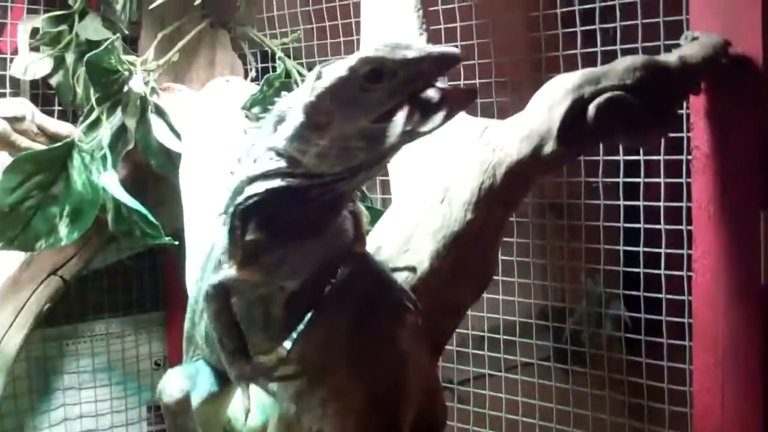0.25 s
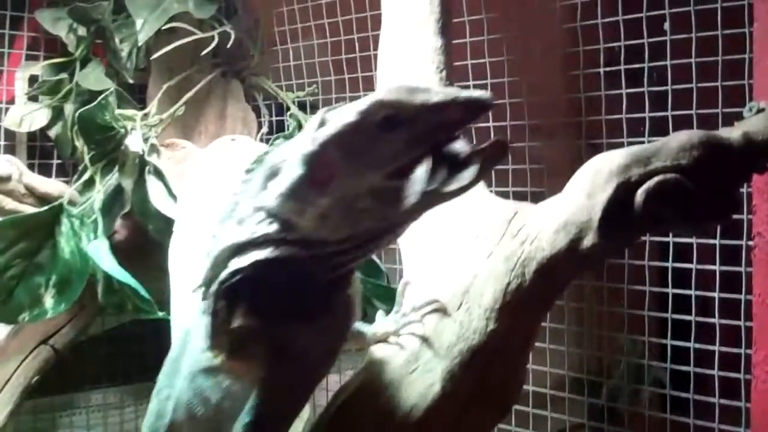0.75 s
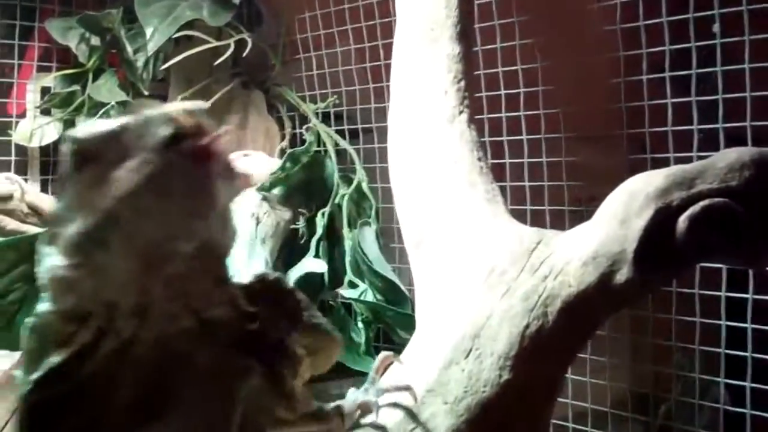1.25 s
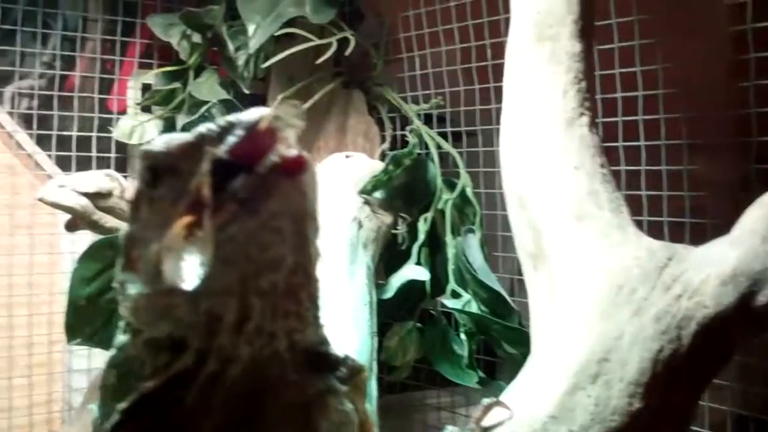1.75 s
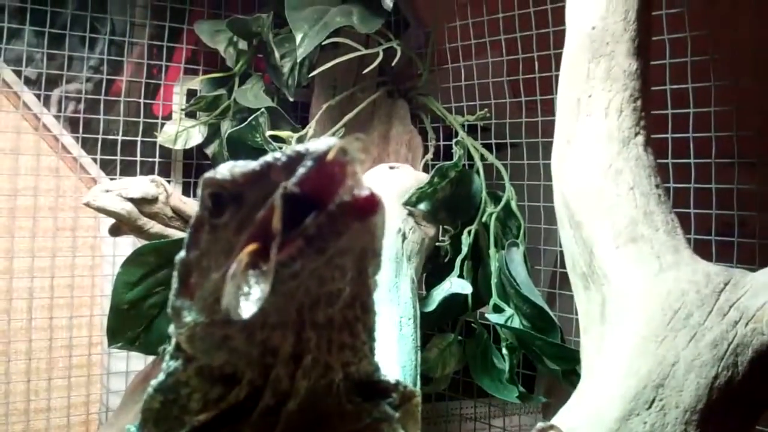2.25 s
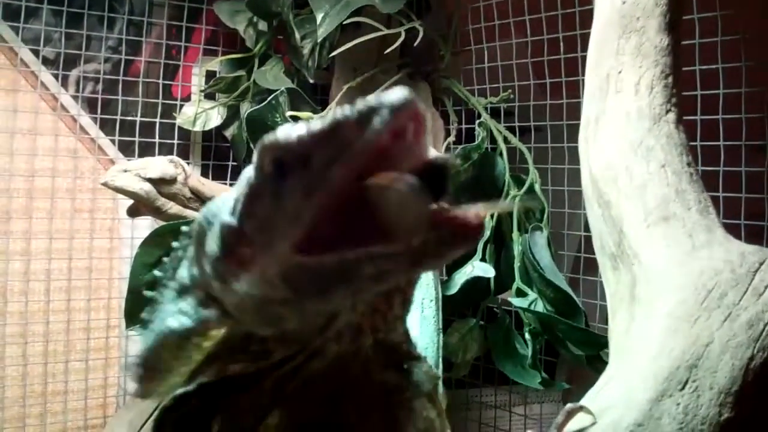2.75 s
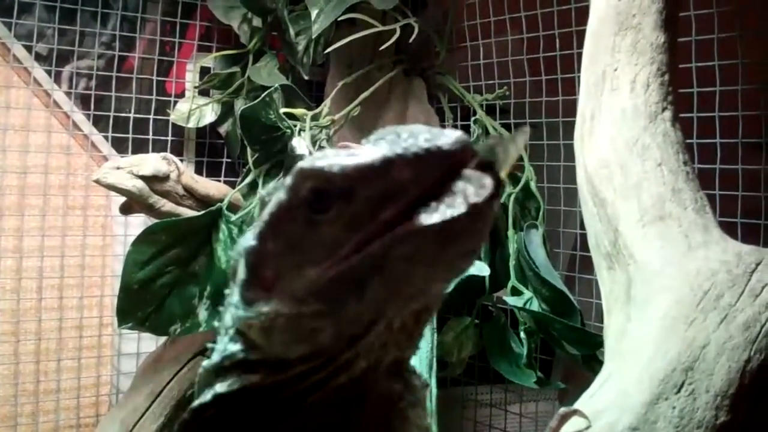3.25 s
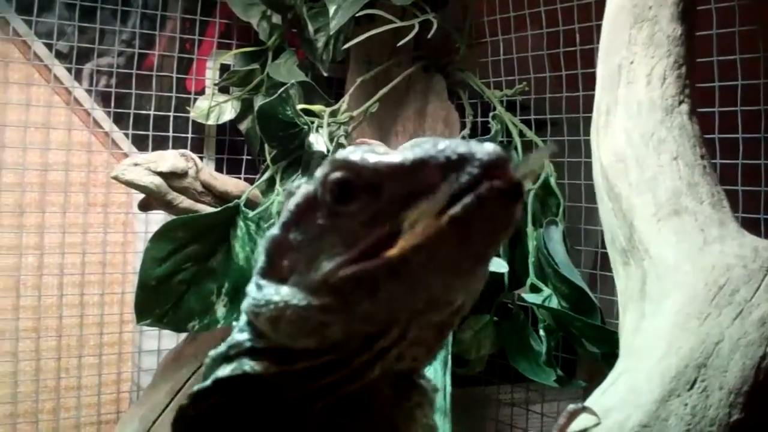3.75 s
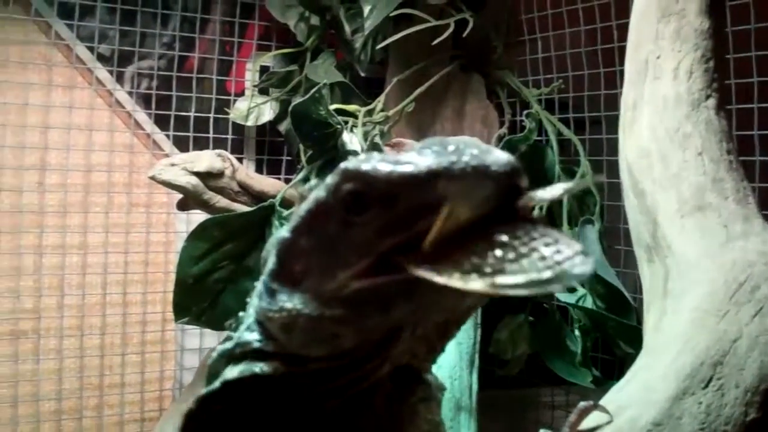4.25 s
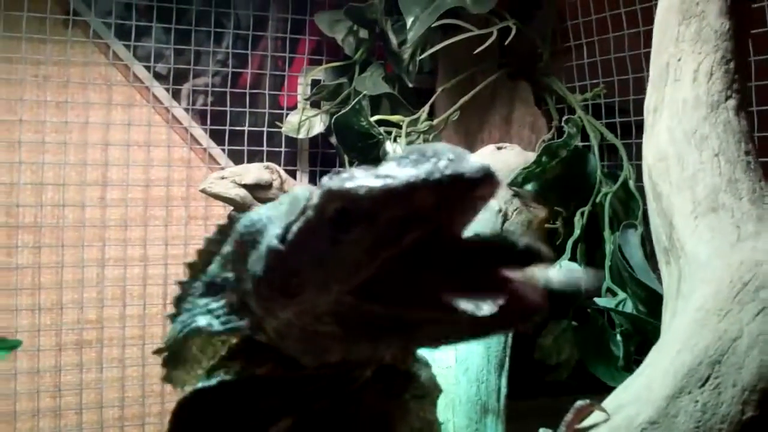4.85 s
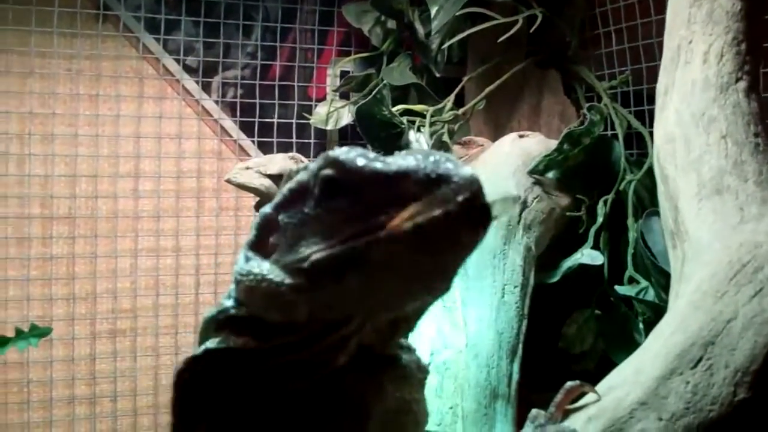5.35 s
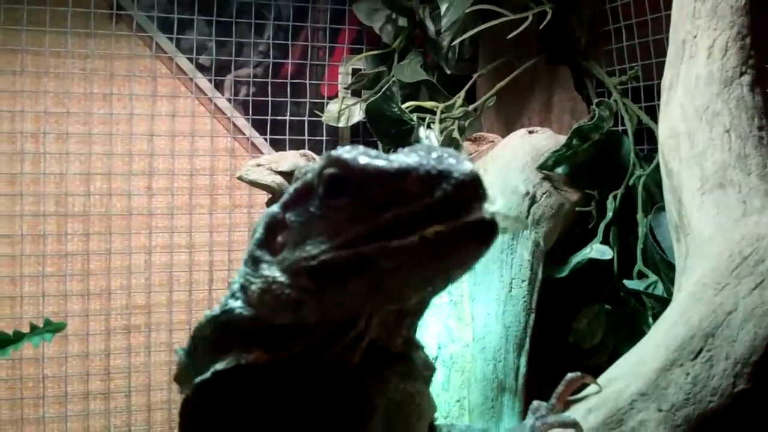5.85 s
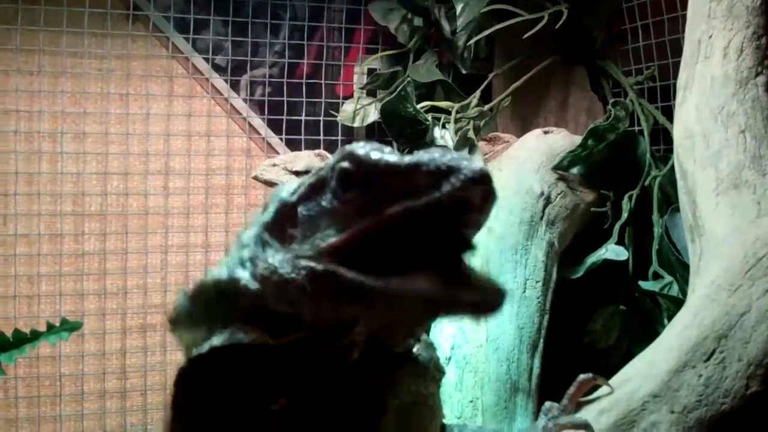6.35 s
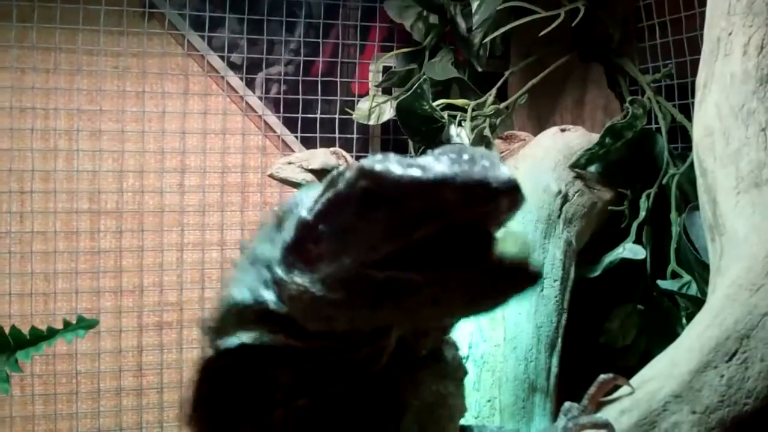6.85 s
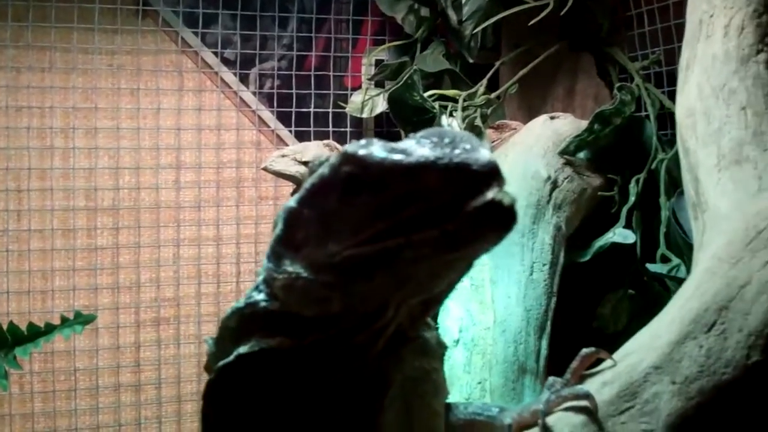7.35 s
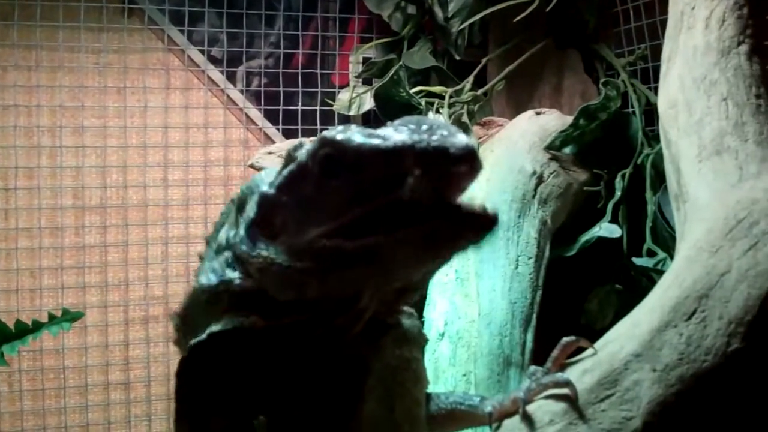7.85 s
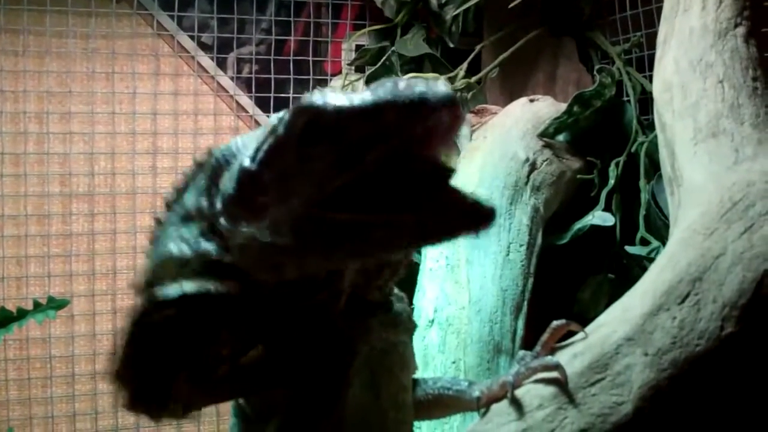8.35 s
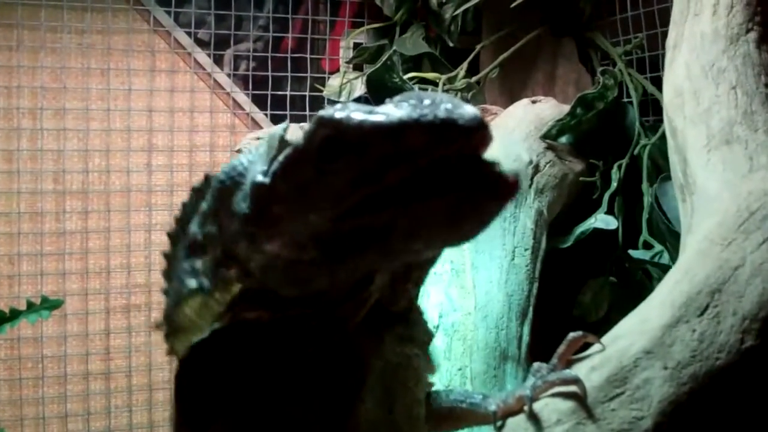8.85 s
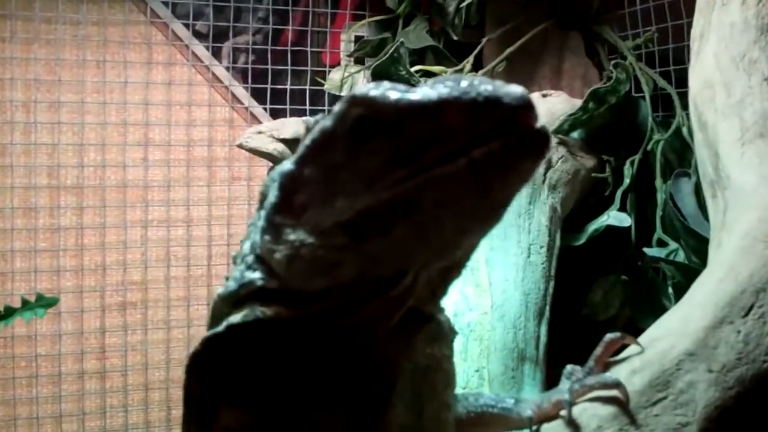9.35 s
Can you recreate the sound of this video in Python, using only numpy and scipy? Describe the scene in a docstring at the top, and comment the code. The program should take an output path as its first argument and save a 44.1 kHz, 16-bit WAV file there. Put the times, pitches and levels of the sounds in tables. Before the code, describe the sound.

A lizard crunches a large insect close by, crisp bright snaps and wing rustles over low hum and a fluttering, pulsing hollow rush.

```python
"""In a mesh terrarium a lizard clambers along a branch, claws scraping, and chews a large insect close by.
Each bite is a rustle of wings, then a crush: a swarm of tiny random fractures, with sharp snaps set singly.
Jaws and feet knock as pushes with a low ring; faint squeaks are notes of unsteady pitch. Behind lie hum, room
noise and a hollow rush, resonant noise surging about three times a second; gain control ducks loud sounds."""
import sys
import numpy as np
from scipy import signal
from scipy.fft import rfft, irfft, next_fast_len
from scipy.io import wavfile
from scipy.ndimage import uniform_filter1d, map_coordinates

SR = 44100
rng = np.random.default_rng(int(sys.argv[2]) if len(sys.argv) > 2 else 0)


def transcribe(u):
    """Save the signal u as a 16-bit wav file named by the first command-line argument.

    u: samples, shape (n,) or (channels, n), limited to [-1, 1]; the rate is SR.
    q: integer samples, one column per channel.
    """
    v = np.clip(np.atleast_2d(u).T, -1, 1)
    q = np.round(v * 32767).astype(np.int16)
    wavfile.write(sys.argv[1], SR, q)


N = 423360
TIME = np.arange(N) / SR  # s
MOUTH_HZ = 3810  # ring of the open mouth

# Spectrum of the cracking shell. Each row: frequency in Hz, relative density in dB.
SHELL_SPECTRUM = [(100, -36), (900, -14), (2200, -9.5), (3700, -4), (5600, -4.5), (8500, 1), (11000, -1),
                  (14000, -0.5)]


def amp(db):
    """Decibels to gain."""
    return 10 ** (np.asarray(db) / 20)


def unit(x):
    """Scale to rms 1."""
    return x / np.sqrt(np.mean(x ** 2) + 1e-20)


def along(points, hz):
    """Interpolate (Hz, value) points on a log frequency axis."""
    point_hz, values = np.transpose(points)
    return np.interp(np.log(hz + 1), np.log(point_hz), values)


def over_time(points):
    """Join (s, value) points by straight lines."""
    return np.interp(TIME, *np.transpose(points))


def wobble(knots_per_s):
    """Smooth random curve through normally distributed knots."""
    return map_coordinates(rng.standard_normal(4096), [TIME * knots_per_s], mode="wrap")


def swells(rows, rest_db, steepness=2):
    """Power of overlapping (middle s, half length s, dB) swells over a rest level; steep ones end abruptly."""
    def bell(u):
        return np.exp(-np.minimum(np.abs(u), 6) ** np.where(u < 0, 2, steepness))

    coarse_s = TIME[::20]
    power = sum(amp(db) ** 2 * bell((coarse_s - s) / half_s) for s, half_s, db in rows)
    return amp(rest_db) ** 2 + np.interp(TIME, coarse_s, power)


def filtered(x, response):
    """Multiply the spectrum of x by a response of frequency in Hz."""
    size = next_fast_len(N + SR // 2)
    hz = np.fft.rfftfreq(size, 1 / SR)
    return irfft(rfft(x, size) * response(hz), size)[..., :N]


def coloured(x, spectrum):
    """Filter x by a (Hz, dB) spectrum."""
    return filtered(x, lambda hz: amp(along(spectrum, hz)))


def resonances(modes, hz):
    """Power-summed gain of (centre Hz, width Hz, dB) resonances."""
    power = 0
    for centre, width, db in modes:
        mode = amp(db) * hz * width / (centre * centre - hz * hz + 1j * hz * width)
        power = power + np.abs(mode) ** 2
    return np.sqrt(power)


def panned(x, left_db):
    """Lean a sound left by a level difference."""
    return x * amp([[left_db / 2], [-left_db / 2]])


def diffuse(gain):
    """Stereo noise of rms 1 from all around: alike in the bass, nearly unrelated in the treble."""
    # Left-right correlation. Each row: frequency in Hz, correlation from 0 to 1.
    correlation = [(100, 0.55), (700, 0.89), (1400, 0.71), (3000, 0.02)]

    def mid_side(hz):
        angle = np.arccos(np.clip(along(correlation, hz), 0, 1)) / 2
        return gain(hz) * np.array([np.cos(angle), np.sin(angle)])

    mid, side = filtered(rng.standard_normal((2, N)), mid_side)
    return unit(np.array([mid + side, mid - side]))


def add(track, s, sound):
    """Mix a sound into a track at time s."""
    part = track[..., max(round(s * SR), 0):][..., :sound.shape[-1]]
    part += sound[..., :part.shape[-1]]


def room(noise_db, hum_db, waver_db):
    """Wavering hum tones of the terrarium's equipment over steady diffuse noise."""
    # Mains hum and neighbouring tones. Each row: frequency in Hz, relative peak level in dB.
    hum_tones = [(97, -76), (120, -64.5), (180, -79), (236.7, -72), (243.3, -76)]
    # Room noise spectrum. Each row: frequency in Hz, relative density in dB.
    noise_spectrum = [(25, -5), (100, -6.5), (220, -2), (340, -4.5), (500, -1), (1300, -27), (2000, -13),
                      (5200, -9), (14000, -5.5)]
    hum = 0
    for hz, db in hum_tones:
        level = amp(db + hum_db + waver_db * wobble(4.1))
        hum = hum + level * np.sin(2 * np.pi * hz * TIME + 0.16 * wobble(2.3))
    noise = amp(noise_db) * diffuse(lambda hz: amp(along(noise_spectrum, hz)))
    return panned(hum + noise, left_db=2.5)


def surges(uneven_db):
    """Surges of the rush: a strictly timed cycle, each surge of slightly different strength."""
    # One cycle. Each row: middle in seconds into the cycle, half length in s, relative level in dB.
    cycle = [(0.023, 0.015, -51.5), (0.07, 0.03, -52), (0.159, .028, -47.9), (0.225, 0.02, -51.5)]
    period_s = .3
    starts_s = np.arange(0, N / SR, period_s)
    return [(start + s, half_s, db + uneven_db * rng.normal())
            for start in starts_s for s, half_s, db in cycle]


def rush(rest_db, hollow_db, whistle_db, brighten, puff_bright_db, flutter_db, shimmer_db):
    """Fluttering noise pulses in shimmering hollow resonances; strong pulses and extra puffs are brighter."""
    # Hollow resonances. Each row: centre in Hz, width in Hz, relative level in dB.
    hollow_modes = [(660, 50, -5), (747, 32, 0), (960, 65, -8), (1118, 60, -5), (1338, 34, -0.5),
                    (1550, 150, -11), (1960, 70, -12)]
    # Thinner upper resonances. Each row: centre in Hz, width in Hz, relative level in dB.
    whistle_modes = [(2650, 1030, 8), (3390, 110, 13), (3633, 59, 16.5), (3880, 260, 4)]
    # Slow level drift. Each row: time in s, gain in dB.
    drift = [(0, 2.5), (.76, 5.5), (1.3, 2), (6.4, 0), (9.45, 2)]
    # Extra puffs of the rush, some on the beat, some between.
    # Each row: middle in s, half length in s, relative level in dB.
    puffs = [(.4, 0.018, -50), (.63, .012, -51), (1.82, 0.01, -50), (1.863, 0.009, -50), (2.21, 0.02, -51),
             (2.83, 0.044, -49), (4.04, 0.014, -48), (4.35, .02, -53), (4.655, 0.019, -52),
             (4.96, .02, -49), (5.255, 0.012, -49), (5.565, .02, -49), (6.105, 0.006, -50),
             (7.115, 0.026, -54), (7.85, 0.012, -48), (8.26, 0.03, -54), (8.545, .02, -48),
             (9.08, 0.012, -50), (9.45, 0.025, -48)]

    def level_db(rows):
        return 10 * np.log10(swells(rows, rest_db)) + over_time(drift)

    def band(hz):
        return 1 / np.sqrt((1 + (520 / (hz + 1)) ** 6) * (1 + (hz / 2500) ** 4))

    beat = surges(uneven_db=0.5)
    swell_db = level_db(beat + list(puffs))
    edge_db = level_db(beat + [(s, half_s, db + puff_bright_db) for s, half_s, db in puffs])
    flutter = flutter_db * (wobble(55) + wobble(170))
    hollow = 0
    for centre, width, db in hollow_modes:
        shimmer = amp(db + shimmer_db * wobble(32))
        noise = diffuse(lambda hz: resonances([(centre, width, 0)], hz) * band(hz))
        hollow = hollow + shimmer * np.sqrt(width) * noise
    body = amp(swell_db + flutter + hollow_db) * unit(hollow)
    brightness_db = brighten * (swell_db - swell_db.mean())
    edge_gain = amp(edge_db + flutter + whistle_db + brightness_db)
    edge = edge_gain * diffuse(lambda hz: resonances(whistle_modes, hz))
    return panned(body, left_db=2.5) + panned(edge, left_db=7.5)


def squeaks(level_db, width):
    """Brief, faint sine notes of unsteady pitch under bell-shaped envelopes."""
    # Each row: middle in s, half length in s, frequency in Hz, relative level in dB.
    notes = [(0.528, 0.024, 1560, -37.5), (0.72, 0.022, 2720, -36), (1.003, 0.011, 2880, -43),
             (9.173, 0.014, 443, -43.5)]
    out = 0
    for s, half_s, hz, db in notes:
        phase = 2 * np.pi * hz * np.cumsum(1 + width * wobble(480)) / SR
        out = out + amp(db + level_db) * np.exp(-((TIME - s) / half_s) ** 2) * np.sin(phase)
    return out


def scrapes(level_db, rough_db):
    """A claw slips on bark at once and skids to rest, catching on the grain with a thin, gritty hiss."""
    # Claw slips. Each row: start in s, relative level in dB, 60 dB decay time in s.
    slips = [(.397, -44, .12), (.454, -38, .06), (.462, -36, .1), (.517, -25.5, .07), (.689, -26, .04),
             (.701, -28, .11), (.723, -29.5, .07), (.858, -46, .05), (.91, -45, .06), (.952, -35, .12),
             (.971, -33, .13)]
    # Scratch spectrum. Each row: frequency in Hz, relative density in dB.
    scratch_spectrum = [(100, -35), (500, -14.5), (2000, -20.5), (2750, -12.5), (4000, -23), (8000, -14),
                        (11500, -5), (13500, -2.5)]
    power, t = np.zeros(N), np.arange(SR // 5) / SR
    for s, db, t60_s in slips:
        add(power, s, amp(db - 60 * t / t60_s) ** 2)
    catching = amp(rough_db * (wobble(1500) + wobble(250)))
    noise = rng.standard_normal((2, N)) + rng.standard_normal(N)  # partly shared by both sides
    grit = unit(coloured(noise * catching, scratch_spectrum))
    return panned(amp(level_db) * np.sqrt(power) * grit, left_db=1.5)


def knocks(level_db, ring_db, t60_s):
    """Dead contacts of jaws and feet: one abrupt push and a brief low ring."""
    # Each row: start in s, relative level in dB, ring in Hz.
    contacts = [(0.975, -48, 176), (1.1768, -42, 218), (1.1968, -49, 900), (2.4815, -41.5, 200),
                (2.4962, -45.5, 220), (2.5103, -43, 180), (2.861, -51, 294), (7.746, -48, 420),
                (7.755, -47, 430)]
    # Knock spectrum. Each row: frequency in Hz, relative density in dB.
    jaw_spectrum = [(30, -12), (150, -7), (450, 1), (900, 0), (3000, -1.5), (6000, -2)]
    out, t = np.zeros(N), np.arange(SR // 25) / SR
    for s, db, hz in contacts:
        ring = amp(-60 * t / t60_s) * np.cos(2 * np.pi * hz * t)
        push = t == 0
        add(out, s, amp(db + level_db) * (push + amp(ring_db) * ring / np.linalg.norm(ring)))
    return coloured(out, jaw_spectrum)


def chewing():
    """Power of the crackle: each bite is a rustle, then a crush that stops as the jaws meet."""
    # Jaws closing on shell and wings. Each row: middle in s, half length in s,
    # relative level of the crush in dB, relative level of the rustle before it in dB.
    bites = [(1.199, 0.032, -35.5, -60), (1.539, 0.022, -38, -45), (2.495, 0.027, -37.5, -56),
             (2.545, 0.01, -38, -67), (2.889, 0.02, -38.5, -48.5), (3.287, 0.007, -31, -52),
             (3.318, 0.012, -30.5, -53), (3.742, 0.03, -46, -47), (4.12, 0.007, -33, -55),
             (4.158, 0.015, -33, -59), (4.571, 0.006, -41, -48), (5.052, 0.008, -36, -46),
             (5.38, 0.01, -47, -49), (5.748, 0.009, -39.5, -47.5), (6.181, 0.005, -35.5, -47),
             (6.542, 0.041, -39.5, -55), (7.02, 0.012, -45, -56.5), (7.751, 0.007, -36, -49),
             (8.066, 0.019, -39, -60), (8.113, 0.011, -33, -44), (8.483, 0.007, -46, -54.5),
             (8.952, 0.022, -37, -49.5)]
    # Faint crackle between bites. Each row: time in s, relative level in dB.
    between = [(0, -59), (.25, -54.5), (.6, -53.5), (3.3, -59.5), (4.75, -57), (5.15, -60.5), (5.55, -49),
               (6.6, -62.5), (6.8, -50.5), (7.3, -64), (8.3, -59.5), (9.35, -55), (9.6, -64)]
    rustle_lead_s, rustle_half_s = 0.068, 0.088  # the prey shifts in the opening mouth
    crushes = [(s, half_s, db) for s, half_s, db, _ in bites]
    rustles = [(s - rustle_lead_s, rustle_half_s, db) for s, _, _, db in bites]
    return swells(crushes + rustles, over_time(between), steepness=5.4)


def crackle(power, level_db, rate_per_s, size_db, tint_db, drift_db,
            splinter_db, splinter_life_s, hiss_db, apart):
    """Tiny fractures of uneven size and colour, denser and louder as the jaws press."""
    # Deeper crunches, the closing mouth ringing. Each row: middle in s, half length in s, level in dB.
    squeezes = [(3.32, .012, -38), (4.16, .012, -42), (5.05, .01, -40), (6.562, .012, -45),
                (8.117, .011, -37), (8.99, .007, -39)]
    squeeze_width_hz = 500
    density = rate_per_s * (power / power.mean()) ** .3
    sizes = amp(size_db * np.clip(rng.standard_normal(N), -2, 2)) * rng.choice([-1, 1], N)
    grains = unit((rng.random(N) < density / SR) * sizes / np.sqrt(density))
    # fractures shed decaying splinter noise
    decay = np.exp(-1 / (splinter_life_s * SR))
    shed = np.sqrt(np.abs(signal.lfilter([1], [1, -decay], grains ** 2)))
    fizz = (amp(splinter_db) * unit(shed) + amp(hiss_db)) * rng.standard_normal((2, N))
    # each grain reaches the two ports at its own strengths
    grains = grains * (1 + apart * rng.standard_normal((2, N)))
    # thick pieces crack dull, thin ones bright; the mix drifts
    texture = 0
    for low_hz, high_hz in [(0, 5500), (5500, 10500), (10500, SR)]:
        def band(hz):
            return 1 / (1 + (hz / high_hz) ** 8) / (1 + (low_hz / (hz + 1)) ** 8)

        pieces = unit(grains * amp(tint_db * rng.uniform(-1, 1, N))) + fizz
        texture = texture + filtered(pieces * amp(drift_db * wobble(50)), band)
    crisp = amp(level_db) * np.sqrt(power) * unit(coloured(texture, SHELL_SPECTRUM))
    mouth = filtered(texture, lambda hz: resonances([(MOUTH_HZ, squeeze_width_hz, 0)], hz))
    deep = np.sqrt(swells(squeezes, -np.inf)) * unit(mouth)
    return panned(crisp + deep, left_db=3)


def snaps(level_db, cycles, splinter_db, splinter_t60_s, splinter_size_db, mouth_db, left_db, spread_db):
    """Each crack is a short kick trailed by uneven splinters; big ones are duller and ring the mouth more."""
    # Sharpest cracks of the shell. Each row: time in s, relative level in dB.
    cracks = [(1.122, -18.0), (1.1624, -10.0), (1.1741, -12.5), (1.1768, -9.5), (1.1799, -8.5),
              (1.1968, 0.5), (1.3958, -16.5), (1.411, -10.5), (1.4216, -7.0), (1.5038, -7.5),
              (1.5061, -10.5), (1.5322, -8.5), (1.539, -11.5), (1.5416, -11.5), (1.5453, -12.5),
              (1.5579, -15.0), (1.6145, -18.5), (1.6301, -13.5), (2.4642, -14), (2.4765, -8.0),
              (2.4783, -10.0), (2.4815, -5.5), (2.4884, 2.5), (2.4961, -1.0), (2.5027, -6.0),
              (2.5095, -4.5), (2.5158, -2.0), (2.518, -5.0), (2.5398, -9.5), (2.5419, -10.5),
              (2.5551, -8.0), (2.598, -16), (2.6017, -14.5), (2.7418, -13.0), (2.8802, -6.5), (2.892, -6.0),
              (2.9035, -9.0), (2.9062, -9.0), (2.9192, -14.0), (3.1615, -8.5), (3.1859, -10.0),
              (3.1909, -12.5), (3.2804, -6.5), (3.2841, -5.0), (3.2862, -7.0), (3.3084, -8.0),
              (3.3301, -8.5), (3.5573, -15.0), (3.5605, -18.0), (3.6038, -18.0), (3.7054, -17.0),
              (3.722, -15.0), (3.7323, -11.5), (3.7405, -15.5), (3.7435, -14.5), (3.7535, -11.5),
              (3.8191, -17.0), (4.0772, -10.0), (4.0813, -9.0), (4.1078, -14.5), (4.1104, -5.5),
              (4.1153, 1.0), (4.1207, -4.0), (4.1486, -8.0), (4.1539, -5.0), (4.1613, -4.5),
              (4.1765, -11.0), (4.2518, -15.5), (4.3826, -11.5), (4.4236, -14.5), (4.4712, -16.0),
              (4.5421, -13.0), (4.5676, -12.5), (4.6011, -19.5), (4.8605, -16.5), (4.9429, -15.0),
              (4.9473, -12.5), (4.9602, -17.0), (4.982, -16.0), (5.1235, -16.0), (5.1358, -11.5),
              (5.2062, -13.0), (5.3071, -17.5), (5.3301, -17.0), (5.3623, -5.5), (5.3759, -11.0),
              (5.3889, -9.0), (5.4211, -16.0), (5.445, -11.5), (5.5162, -14.5), (5.7009, -16.5),
              (5.7194, -16.0), (5.7446, -13.5), (5.9946, -11.5), (6.0344, -16.5), (6.1272, -15.0),
              (6.152, -5.5), (6.182, -12.0), (6.3164, -17.5), (6.3197, -16.5), (6.3867, -15.0),
              (6.4338, -18.5), (6.512, 0.5), (6.5204, -3.0), (6.5285, -7.5), (6.5597, -9.5),
              (6.6456, -17.5), (6.7701, -14.5), (6.8403, -12.0), (7.0094, -17.5), (7.0225, -15.0),
              (7.7153, -15.0), (7.7463, -13.0), (7.7562, -7.5), (8.0242, -16.5), (8.0303, -16.0),
              (8.0404, -9.0), (8.0445, 0.5), (8.0506, -9.0), (8.0863, -11.0), (8.108, -8.0), (8.1117, -3.0),
              (8.1228, -1.5), (8.3755, -17.0), (8.4314, -10.0), (8.4915, -18.5), (8.497, -18.5),
              (8.9081, -17.0), (8.9345, -10.5), (8.9388, -5.5), (8.9527, -6.0), (8.9642, -11.5),
              (8.9897, -3.0), (8.992, -11.5), (9.3531, -13.0)]
    crack_hz, fall_per_db, scatter = 10340, .006, 0.3  # centre at 0 dB, log fall with size, log spread
    mouth_t60_s = 0.0044
    low_hz = 1980  # so small a shell radiates little below this
    out, t = np.zeros((2, N)), np.arange(SR // 50) / SR
    splinters = np.zeros((2, N))
    for s, db in cracks:
        hz = crack_hz * np.exp(-fall_per_db * db + scatter * rng.uniform(-1, 1))
        age = t * hz / cycles
        kick = age ** 2 * np.exp(-age) * np.sin(2 * np.pi * (hz * t + rng.random()))
        ring_hz = MOUTH_HZ * (1 + 0.025 * rng.normal())
        ring = amp(-60 * t / mouth_t60_s) * np.sin(2 * np.pi * ring_hz * t)
        ring_gain = amp(mouth_db) * (MOUTH_HZ / hz) ** 2
        crack = kick / np.linalg.norm(kick) + ring_gain * ring / np.linalg.norm(ring)
        # start early so that the kick peaks at s
        add(out, s - 2 * cycles / hz, panned(amp(db + level_db) * crack, left_db + spread_db * rng.normal()))
        sizes = amp(splinter_size_db * np.clip(rng.standard_normal(len(t)), -2, 2))
        chips = unit(sizes * rng.standard_normal((2, len(t))))
        add(splinters, s, amp(db + splinter_db - 60 * t / splinter_t60_s) * chips)
    radiated = filtered(out, lambda hz: 1 / (1 + (low_hz / (hz + 1)) ** 2))
    return radiated + coloured(splinters, SHELL_SPECTRUM)


def terrarium(x, wet_db, t60_s):
    """The close walls answer with a short diffuse tail of decaying noise."""
    t = np.arange(SR // 4) / SR
    tail = rng.standard_normal((2, len(t))) * amp(-60 * t / t60_s) * (t > .002)
    return x + amp(wet_db) * signal.fftconvolve(x, tail / np.linalg.norm(tail[0]), axes=1)[:, :N]


def scene():
    """Chewing and clambering in their enclosure, over the background and squeaks."""
    cracks = snaps(level_db=0.2, cycles=0.8, splinter_db=-15, splinter_t60_s=0.009,
                   splinter_size_db=7, mouth_db=0, left_db=2.5, spread_db=2)
    crunch = crackle(chewing(), level_db=5.5, rate_per_s=480, size_db=3, tint_db=7, drift_db=3,
                     splinter_db=0, splinter_life_s=.0007, hiss_db=-14, apart=.7)
    thumps = knocks(level_db=33.5, ring_db=-14.5, t60_s=0.024)
    claws = scrapes(level_db=7.5, rough_db=2.5)
    hollow = rush(rest_db=-56, hollow_db=-1.5, whistle_db=-8.5, brighten=0.55,
                  puff_bright_db=3, flutter_db=1.5, shimmer_db=2)
    background = hollow + room(noise_db=-49.5, hum_db=2.0, waver_db=1.0)
    near = terrarium(cracks + crunch + thumps + claws, wet_db=-9, t60_s=0.05)
    return near + background + squeaks(level_db=-4, width=0.0423)


def gain_control(x, threshold_db, slope, release_db_per_s, attack_s):
    """Loud sounds pull the gain down; it creeps back at a constant rate in dB."""
    power = uniform_filter1d(x.mean(0) ** 2, size=132)  # 3 ms average
    level_db = 10 * np.log10(np.abs(power) + 1e-12)
    cut_db = slope * np.maximum(level_db - threshold_db, 0)
    release_db = release_db_per_s * TIME
    held_db = np.maximum.accumulate(cut_db + release_db) - release_db
    pole = np.exp(-1 / (attack_s * SR))
    return x * amp(-signal.lfilter([1 - pole], [1, -pole], held_db))


def record(dry):
    """The camera's gain control, two ports a hair apart, steep treble cut and band limit."""
    # Treble resonance of the right port. Each row: frequency in Hz, gain in dB.
    right_port = [(5000, 0), (8500, -1.5), (13000, 2)]
    # Treble cut of the whole sound. Each row: frequency in Hz, gain in dB.
    treble_cut = [(14200, 0), (14500, -19), (16000, -34)]
    right_lag_s, top_hz = 1.2e-5, 16600
    left, right = gain_control(dry, threshold_db=-34, slope=.44, release_db_per_s=19, attack_s=.005)
    right = filtered(coloured(right, right_port), lambda hz: np.exp(-2j * np.pi * hz * right_lag_s))
    return filtered(np.array([left, right]), lambda hz: amp(along(treble_cut, hz)) * (hz < top_hz))


dry = scene()
out = record(dry)
transcribe(out)
```